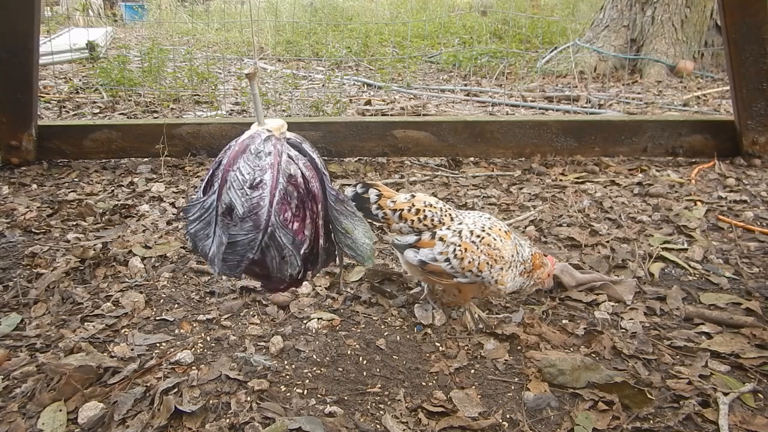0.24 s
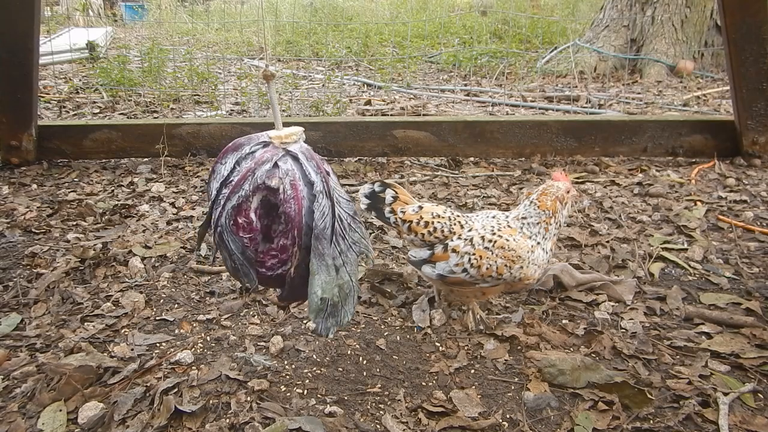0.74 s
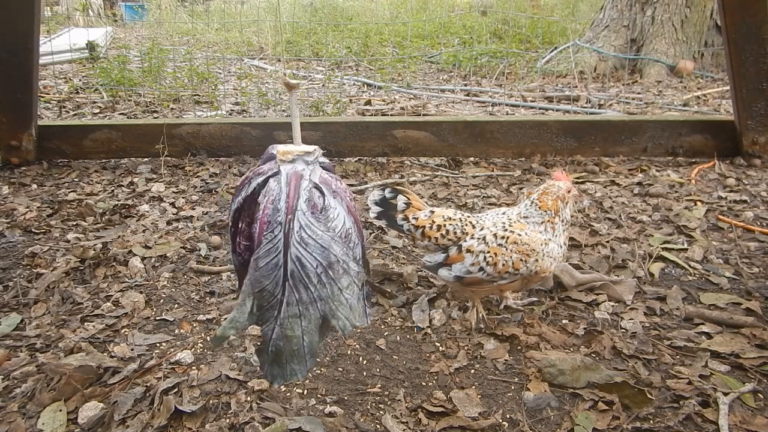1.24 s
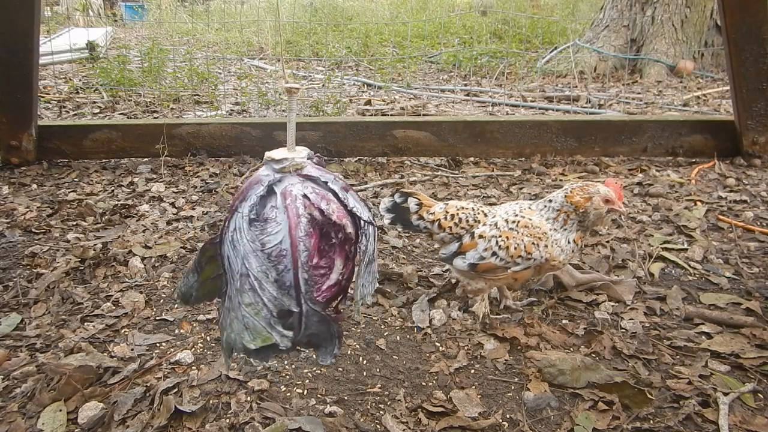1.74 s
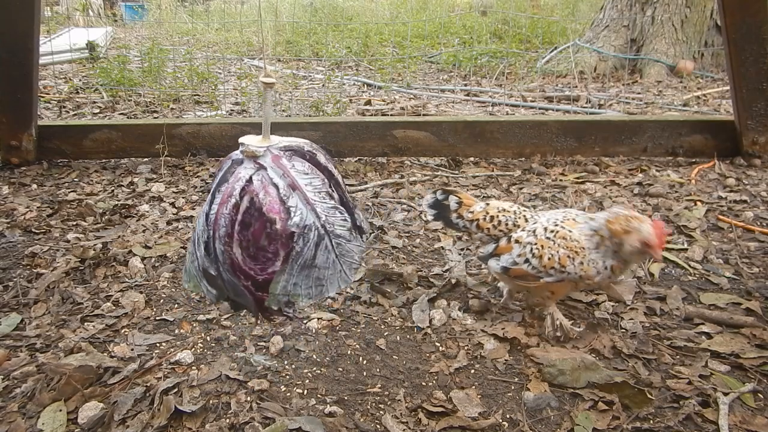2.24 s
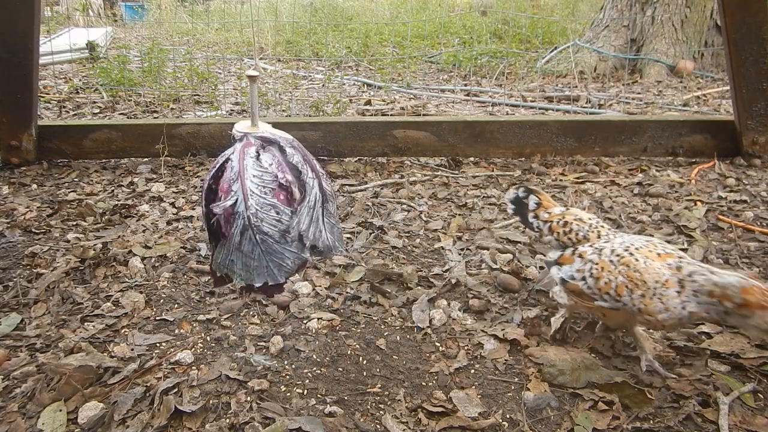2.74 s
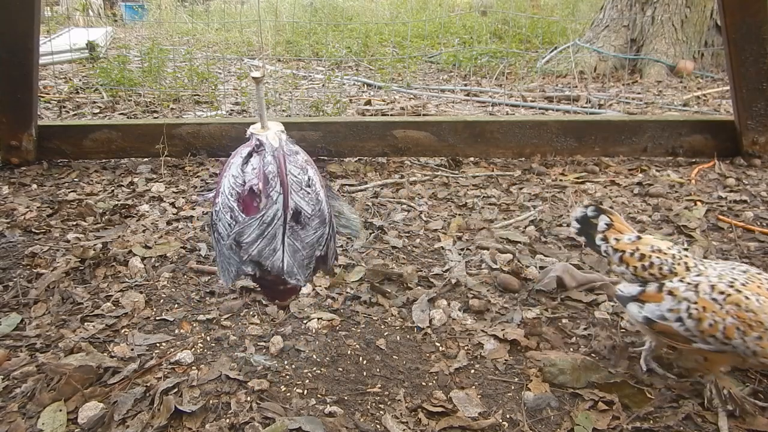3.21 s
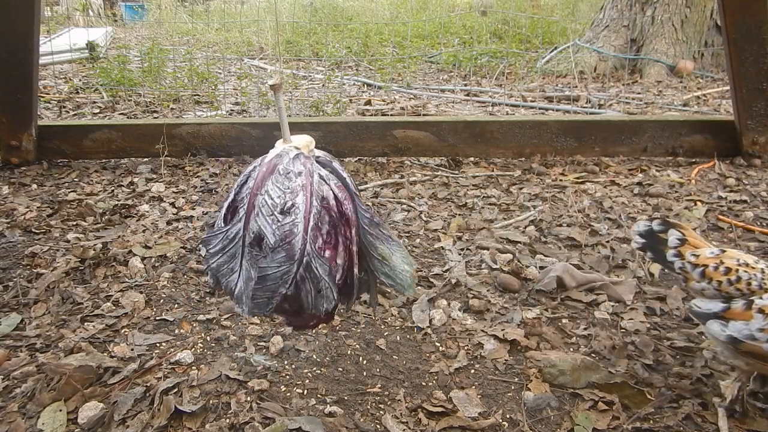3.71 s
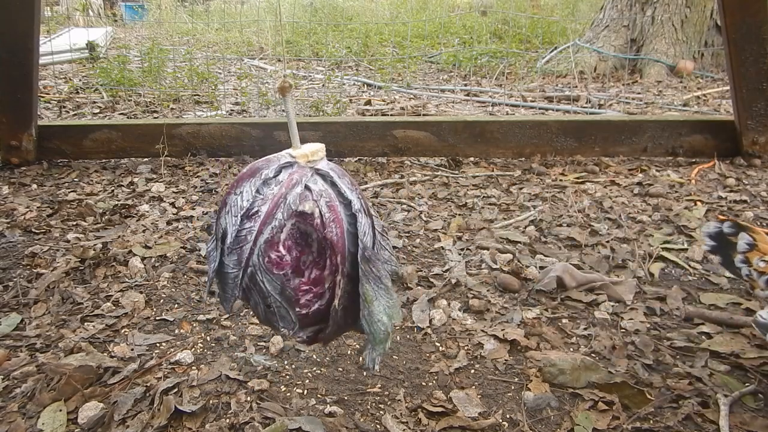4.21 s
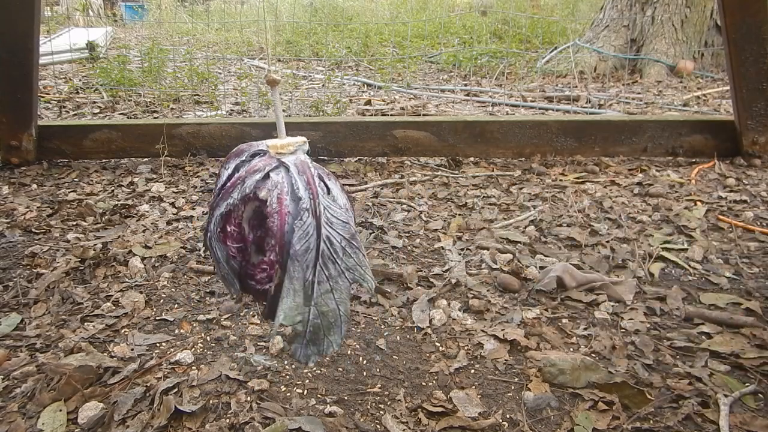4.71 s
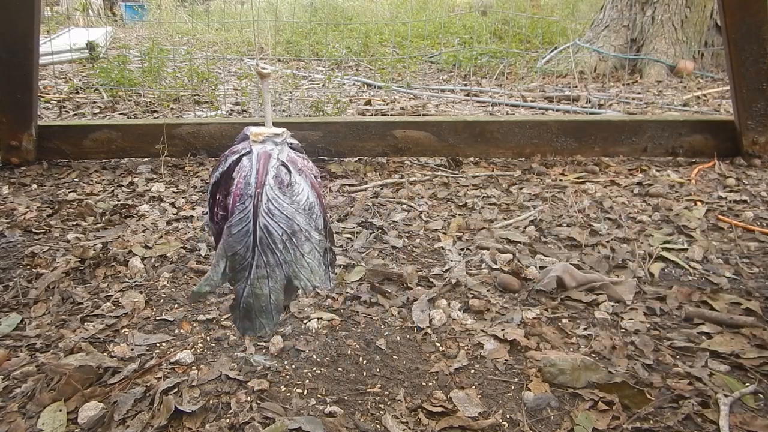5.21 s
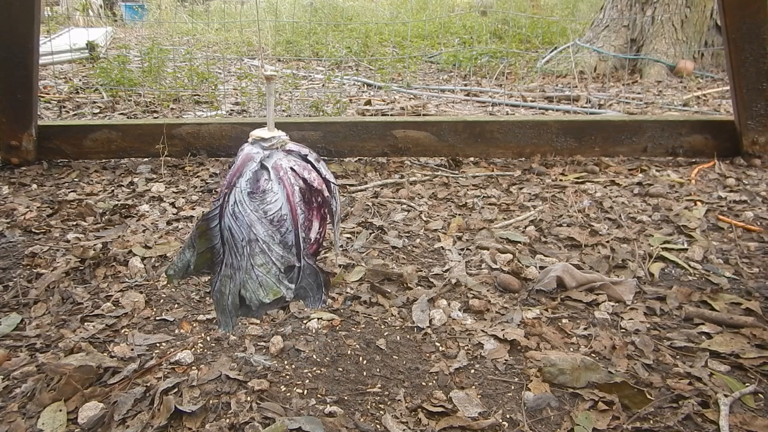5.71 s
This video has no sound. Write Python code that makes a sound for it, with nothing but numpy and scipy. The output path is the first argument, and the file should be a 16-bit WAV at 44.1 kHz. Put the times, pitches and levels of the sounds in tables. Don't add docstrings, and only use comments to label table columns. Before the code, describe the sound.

Outdoors, quiet leaf litter crackles above a steady distant drone; one sharp snap at left, then vigorous crunchy leaf raking nearby.

```python
import sys
import numpy as np
from scipy import signal
from scipy.io import wavfile
from scipy.ndimage import uniform_filter1d

SR = 44100
rng = np.random.default_rng(int(sys.argv[2]) if len(sys.argv) > 2 else 0)


def attenuation_scalar(level_db):
    decades = np.asarray(level_db, float) / 20
    return 10 ** decades


def inscribe(sig):
    pcm = np.round(np.clip(np.atleast_2d(sig).T, -1, 1) * 32767)
    wavfile.write(sys.argv[1], SR, pcm.astype(np.int16))


N = 262395

# f/Hz, level/dB
LEAF = [(300, -5.5), (700, -9.5), (1500, -3.5), (3000, -0.5), (5000, 9.5), (8000, 2.5), (11000, -12.5),
        (15000, -28)]
# f/Hz, width/Hz, level/dB
LEFT_PORT = [(7300, 210, 3), (9360, 660, 1.5), (11200, 400, -5), (12300, 1100, 1), (13900, 500, -2)]
RIGHT_PORT = [(6400, 450, 4), (8840, 810, 2.5), (10900, 470, -15), (11900, 500, -2), (12800, 400, -8)]


def evened(x):
    return x / np.sqrt(np.mean(x ** 2) + 1e-20)


def read(points, hz):
    f, value = np.transpose(points)
    return np.interp(np.log(hz + 1), np.log(f + 1), value)


def add(mix, s, sound):
    part = mix[:, round(s * SR):][:, :sound.shape[-1]]
    part += sound[..., :part.shape[1]]


def slow(rate, count):
    t, phase = np.arange(0, N, 256) / SR, rng.random((count, 20, 1))
    f = np.geomspace(.15, rate, 20)[:, None]
    drift = (np.sin(2 * np.pi * (f * t + phase)) / np.sqrt(f)).sum(axis=1)
    return np.array([np.interp(np.arange(N) / SR, t, evened(d)) for d in drift])


def sides(lean_db):
    return attenuation_scalar(np.array([lean_db / 2, -lean_db / 2]))


def bandpassed(x, order, edges_hz):
    return signal.sosfilt(signal.butter(order, edges_hz, "bandpass", fs=SR, output="sos"), x)


def housed(x, colour, ports=([], [])):
    # f/Hz, width/Hz, level/dB
    housing = [(2505, 178, -18.5), (5005, 81, -17), (6175, 1630, 8.5), (7326, 960, -10), (8180, 800, 3.5),
               (10270, 1260, -5.5), (12000, 590, 4)]
    hz = abs(np.fft.fftfreq(8192, 1 / SR))
    db = []
    for port in ports:
        bumps = sum(peak_db * np.exp(-(2 * (hz - f) / w) ** 2) for f, w, peak_db in housing + port)
        db.append(read(colour, hz) + bumps)
    log_gain = np.log(attenuation_scalar(np.array(db)))
    phase = -signal.hilbert(log_gain).imag
    taps = np.fft.ifft(np.exp(log_gain + 1j * phase)).real[:, :2048]
    return signal.oaconvolve(x, taps, axes=1)[:, :x.shape[1]]


def split(x, edges_hz=(300, 2450, 7300, 10700, 16000)):
    return [evened(bandpassed(x, 4, edge)) for edge in zip(edges_hz, edges_hz[1:])]


def two_ports(direct, scattered, share):
    share = np.clip(share, 0, 1)
    return np.sqrt(1 - share) * np.array([direct, np.roll(direct, 1)]) + np.sqrt(share) * scattered


def pushes(rows, entry_db, fall_db_per_s):
    s, push, peak_db = np.transpose(rows)[:3, :, None]
    since = np.arange(0, N / SR + .002, .001) - s
    swell_db = entry_db * np.clip(1 - since / push, 0, 1)
    db = peak_db + swell_db - fall_db_per_s * np.maximum(since - push, 0)
    return attenuation_scalar(db) ** 2 * np.clip(since / .002 + 1, 0, 1)


def per_sample(curve):
    return np.interp(np.arange(N) / SR, np.arange(len(curve)) / 1000, curve)


def wash():
    # f/Hz, level/dB per Hz
    spectrum = [(30, 5), (60, 18), (85, 22), (115, 18), (190, 12), (300, 5.5), (600, -0.5), (1200, 2.5),
                (2000, -6.5), (4000, -7), (6300, -11), (8100, -0.5), (9500, -22.5), (14000, -21)]
    # f/Hz, likeness
    likeness = [(60, 1), (130, 1), (290, 0.37), (640, 0.39), (1410, 0.34), (3100, 0.083), (6820, 0.11),
                (15000, 0.064)]
    # f/Hz, level/dB
    balance = [(60, 2), (180, -3), (550, -3), (1650, -3.5), (4970, 2.5), (15000, -2.5)]
    frames, hz = N // 256 + 5, np.fft.rfftfreq(1024, 1 / SR)
    a, b, c, d, patches = rng.standard_normal((frames, 513, 5)).T
    patches = evened(uniform_filter1d(uniform_filter1d(patches, size=12, axis=0), size=10, axis=1))
    same = np.clip(read(likeness, hz), -1, 1)[:, None]
    right = a + 1j * b
    lead = np.exp(1j * hz / 6000)[:, None]
    left = same * right * lead + np.sqrt(1 - same ** 2) * (c + 1j * d)
    z = np.array([left, right]) * sides(read(balance, hz))[:, :, None] * attenuation_scalar(1.4 * patches)
    air = housed(signal.istft(z, nperseg=1024, noverlap=768)[1][:, :N], spectrum)
    highpass = signal.butter(4, 300, "highpass", fs=SR, output="sos")
    upper = signal.sosfilt(highpass, air.mean(axis=0))
    return attenuation_scalar(-55.5 - 0.84) * air / upper.std()


def engine():
    orders = [6, 12, 14, 15, 16, 17, 18, 21, 24, 26, 27, 30]
    order_db = [-63, -54, -53.5, -53, -66, -64.5, -48, -62.5, -65.5, -70, -67.5, -63.5]
    # t/s, level/dB
    load = [(0, -5), (.46, 3), (.66, 0), (1.06, -9), (1.49, 4.5), (1.8, -3), (2.7, 2.5), (3.55, 3),
            (3.69, -2.5), (3.88, 3), (4.72, 7), (5.25, 0.5), (5.63, -1), (5.95, 5.5)]
    load_share = [0.72, 1.18]
    cycle_hz = 6.25
    order = np.array(orders)[:, None]
    db = np.array(order_db)[:, None] + 1.5 * slow(3.5, count=len(order_db))
    db[1:3] += np.outer(load_share, np.interp(np.arange(N) / SR, *np.transpose(load)))
    turns = np.cumsum(cycle_hz * (1 + 0.00068 * slow(2.75, count=1)[0])) / SR
    lines = np.sin(2 * np.pi * (order * turns + rng.random(order.shape)))
    return (np.sqrt(2) * attenuation_scalar(db) * lines).sum(axis=0) * sides(-4.0)[:, None]


def chirp(length, first_hz, last_hz, overtone_db, rough):
    n = round(length * SR)
    shake, wobble = evened(uniform_filter1d(rng.standard_normal((2, 8000)), size=60))[:, :n]
    glide = first_hz + (last_hz - first_hz) * np.linspace(0, 1, n) ** 1.346
    turn = 2 * np.pi * np.cumsum(glide + 130 * rough * wobble) / SR
    overtones = np.sin(2 * turn) + .3 * np.sin(3 * turn) + .25 * np.sin(4 * turn)
    tone = np.sin(turn) + attenuation_scalar(overtone_db) * overtones
    return np.sqrt(2) * tone * (1 + rough * shake) * signal.windows.tukey(n, .45)


def twitter():
    # t/s, swell/s, level/dB
    bouts = [
        (1.65, 0.094, -48.5),
        (1.83, 0.16, -51),
        (2.07, 0.077, -51.5),
        (2.23, 0.13, -46.5),
        (2.42, 0.135, -47.5),
        (2.63, 0.089, -47),
    ]
    swarm = np.zeros((2, N))
    start_s, end_s = 1.6, 2.85
    for when, pitch, glide, size, side in rng.random((260, 5)):
        hz = 5750 + 1050 * pitch
        note = chirp(0.011 + 0.03 * size, hz, hz + 300 * (glide - .5), -43, 0.21)
        add(swarm, start_s + when * (end_s - start_s), note * sides(9 * side - 6.5)[:, None])
    power = pushes(bouts, entry_db=-1, fall_db_per_s=250).sum(axis=0)
    return swarm * attenuation_scalar(-9.5) * per_sample(np.sqrt(power))


def birds():
    # t/s, length/s, first f/Hz, last f/Hz, overtones level/dB, hoarseness 0-1
    peeps = [
        (.602, .024, 1530, 1330, -9, .2),
        (.828, .028, 1580, 1330, -9, .3),
        (1.378, .042, 1600, 1230, -3, .25),
        (1.655, .04, 1600, 1380, -5, .5),
        (3.853, .028, 690, 720, -14, .15),
        (3.879, .02, 900, 1000, -30, .15),
    ]
    peep_db = [-55, -56.5, -53, -56.5, -56, -49.5]
    # t/s, length/s, first f/Hz, last f/Hz, hoarseness 0-1
    whistles = [(.11, .13, 3110, 3140, .5), (1.42, .105, 1950, 2150, .75), (1.41, .15, 2750, 3000, .8),
                (1.52, .05, 5350, 5380, .3), (1.45, .13, 6100, 6250, .3), (1.815, .07, 2080, 2350, .7),
                (1.945, .06, 2740, 2750, .2), (2.12, .045, 2600, 2780, .6), (2.29, .07, 2740, 2710, .25),
                (2.495, .095, 2740, 2730, .12), (2.655, .1, 2650, 2780, .4), (.605, .045, 4200, 3900, .5),
                (3.879, .027, 1790, 2420, .07), (1.66, .07, 3050, 3250, 1.0), (1.65, .06, 2200, 2100, .9),
                (4.845, .006, 9700, 9300, .5), (5.794, .026, 2300, 2450, .5), (5.8, .026, 1600, 1800, .45),
                (5.795, .03, 830, 850, .3), (5.825, .025, 2250, 2350, .7), (5.64, .06, 1450, 2150, .9),
                (1.06, .02, 4400, 4300, .6), (2.455, .035, 2740, 2730, .2), (.612, .045, 2720, 2720, .35),
                (.838, .045, 2720, 2650, .35), (.825, .06, 4200, 4350, .7), (1.66, .045, 4220, 4180, .4),
                (1.6, .06, 4720, 4700, .4), (1.77, .04, 2620, 2640, .3), (1.84, .045, 3850, 3850, .4),
                (.78, .02, 6300, 5600, .3), (1.385, .06, 2300, 2250, .9), (4.77, .025, 1700, 1500, .9),
                (5.69, .03, 1900, 1650, .9)]
    whistle_db = [-66.5, -63, -63.5, -62, -63, -62, -60.5, -62, -59, -59, -61, -57.5, -46.5, -61.5, -66,
                  -45, -46, -44.5, -61, -49, -48, -58, -64, -59, -62, -63, -64, -66, -62, -66, -58, -62,
                  -50, -48]
    out = np.zeros((2, N))
    for (s, *voice), db in zip(peeps, peep_db):
        add(out, s, attenuation_scalar(db) * chirp(*voice) * sides(-3.0)[:, None])
    for (s, length, first_hz, last_hz, rough), db in zip(whistles, whistle_db):
        add(out, s, attenuation_scalar(db) * chirp(length, first_hz, last_hz, -40, rough) * sides(-3.0)[:, None])
    return out + twitter()


def yard(x):
    t60_s, tail_db, gap_s = 0.14, -7, .006
    t = np.arange(9000) / SR
    tail = rng.standard_normal((2, len(t))) * attenuation_scalar(-60 * t / t60_s) * (t > gap_s)
    return x + attenuation_scalar(tail_db) * signal.fftconvolve(x, tail / np.linalg.norm(tail[0]), axes=1)[:, :N]


def snaps():
    # t/s, level/dB, low part level/dB, left-right level/dB
    wandering = [(0.2725, -35.5, -19, -1.0), (0.6474, -33.5, -17, 11), (0.7337, -22.5, -7, 6),
                 (0.785, -31, -15, -5), (0.8342, -32, -16, -0.5), (1.061, -33.5, -19, -8),
                 (1.1653, -35, -19, -3.0), (2.0297, -34, -18, -2), (2.0586, -29, -10, -0.5),
                 (2.2303, -39, -14, 0.5), (2.2666, -38, -15, -3.5), (2.319, -27, -24, -3.0),
                 (2.5443, -31.5, -16, 1), (2.5888, -37, -14, 2.5), (2.648, -26.5, -19, -2.0),
                 (2.8548, -29.5, -26, -2), (3.0455, -29, -21, -0.5), (3.1472, -29, -20, -4),
                 (3.1812, -27, -23, -3), (3.2445, -30, -25, -4), (3.3453, -29.5, -13, 8),
                 (3.493, -34, -21, -3), (3.5259, -34, -14, 6), (3.8153, -38, -22, 3),
                 (3.8526, -42, -14, 1.5), (3.932, -32.5, -21, -2), (4.0372, -30.5, -23, -4),
                 (4.2628, -31.5, -19, -5.5), (4.3206, -35.5, -26, -3.5)]
    near = [(4.68, -26, -18, -7.5), (4.6992, -29, -25, -8.5), (4.7487, -27, -28, -8.5),
            (4.7624, -19, -23, -12), (4.788, -17, -22, -9.5), (4.8174, -33, -22, -3),
            (4.8394, -33, -26, -4), (4.8573, -23.5, -23, -5), (4.8994, -26, -13, -8.5),
            (4.9105, -25, -20, -9.0), (4.9317, -25, -25, -9.5), (5.0522, -24, -27, -10.5),
            (5.0661, -28, -24, -11), (5.1382, -39, -19, -5.5), (5.196, -20, -33, -11),
            (5.247, -25, -29, -7), (5.383, -21, -28, -10), (5.445, -24, -17, -4.0), (5.4617, -30, -22, -4),
            (5.5575, -25.5, -22, -6.0), (5.5644, -36, -22, -3.0), (5.5973, -22, -15, -10),
            (5.6281, -24, -14, -5), (5.6824, -19, -24, -9.5), (5.6894, -17, -21, -6),
            (5.7094, -15, -24, -8.0), (5.7762, -25, -10, -4.5), (5.8591, -25, -9, -8.0),
            (5.89, -14, -11, -11), (5.9178, -14.5, -18, -7.0)]
    # t/s, level/dB, left-right level/dB
    tick_rows = [(4.6495, -35, -9), (4.691, -29, -8), (4.7557, -22, -8), (4.7719, -21, -11),
                 (4.7778, -23, -9), (4.8006, -27, -9), (4.8475, -32, -5), (4.8669, -35, -7),
                 (4.878, -34, -9), (4.9213, -31, -8), (4.9457, -27, -9), (4.9588, -32, -10),
                 (5.0012, -34, -6), (5.0208, -31, -13), (5.0254, -29, -8), (5.0745, -31, -7),
                 (5.082, -34, -7), (5.1459, -36, -6), (5.1559, -37, -9), (5.1699, -37, -5),
                 (5.1872, -36, -3), (5.2378, -34, -7), (5.2662, -28, -8), (5.2846, -29, -8),
                 (5.2949, -30, -8), (5.3151, -33, -9), (5.3225, -34, -7), (5.3307, -33, -7),
                 (5.3359, -31, -3), (5.3651, -28, -9), (5.3895, -27, -9), (5.4023, -25, -10),
                 (5.4079, -32, -9), (5.4193, -32, -9), (5.4689, -24, -12), (5.4828, -26, -6),
                 (5.4914, -26, -8), (5.5068, -25, -6), (5.5203, -22, -9), (5.5314, -28, -6),
                 (5.545, -32, -5), (5.6028, -32, -8), (5.6133, -34, -4), (5.6533, -21, -9),
                 (5.6634, -19, -11), (5.6723, -17, -9), (5.6958, -16, -8), (5.7041, -16, -11),
                 (5.7184, -18, -6), (5.7352, -23, -7), (5.7469, -25, -5), (5.7611, -30, 1),
                 (5.8069, -30, -3), (5.8536, -32, -6), (5.8759, -22, -12), (5.9031, -20, -8),
                 (5.9144, -18, -9), (5.9258, -18, -8), (5.9391, -22, -8), (5.946, -21, -9)]
    # t/s, level/dB, low part level/dB, left-right level/dB, air level/dB
    more_breaks = [(3.2018, -34, -24, 1, -5), (3.318, -43, -24, 2, 3), (3.3905, -27, -24, 4, -18),
                   (3.3943, -12, -15, 7, -15), (3.3975, -22, -6, 4, -11), (3.442, -38, -2, 0, -25),
                   (.687, -37, -12, 0, -22), (.853, -35, -24, 0, -22), (2.07, -31, -10, -1, -22),
                   (2.6334, -37, -22, -2, -22), (3.1063, -38, -22, -1, -22), (.0473, -40, -20, 2, -22),
                   (3.7988, -40, -22, -1, -22), (3.057, -34, -20, -1, -22), (3.295, -39, -18, 1, -22)]
    tick_db, tick_low_db, leaf_air_db = -3, -15, -22
    ticks = [(s, db + tick_db, tick_low_db, lean_db) for s, db, lean_db in tick_rows]
    breaks = [(*row, leaf_air_db) for row in wandering + near + ticks] + more_breaks
    out, t = np.zeros((2, N)), np.arange(900) / SR
    noise = rng.standard_normal((len(breaks), 3, len(t)))
    noise[:, :, 0] = 2.0
    noise *= np.exp(-t / .0008) + .25 * np.exp(-t / .004)
    raw = []
    for direct, *scattered in noise:
        raw.append(housed(two_ports(direct, np.array(scattered), 0.082), LEAF, (LEFT_PORT, RIGHT_PORT)))
    bands = split(np.array(raw))
    for (s, peak_db, low_db, lean_db, air_db), low, mid, top, air in zip(breaks, *bands):
        lean = sides(lean_db)[:, None]
        bright = (mid + 0.4 * top) * lean
        crack = bright + attenuation_scalar(low_db - 1.0) * low * lean + attenuation_scalar(air_db) * air
        add(out, s, attenuation_scalar(peak_db - 3.0) * crack / abs(bright.mean(axis=0)).max())
    return out


def cracks():
    leaf_sizes_hz = [500, 900, 1500, 2200, 3200, 4400, 6000, 8000, 11000]
    cracks_per_s, spread_db, hiss_share = 850, 3.0, .3
    clumps = attenuation_scalar(1.3 * evened(uniform_filter1d(rng.standard_normal(N), size=250)))
    out = np.zeros((3, N))
    for hz in leaf_sizes_hz:
        when = rng.random(N) < cracks_per_s / SR
        size = attenuation_scalar(spread_db * np.minimum(rng.exponential(1, N), 2.2)) * when
        decay = np.exp(-hz / SR / 1.6)
        burst = signal.lfilter([1], [1, -decay], size ** 2) ** .5
        grains = (evened(burst) + hiss_share) * rng.standard_normal((3, N))
        out += bandpassed(grains, 1, [hz / 1.3, hz * 1.3])
    return clumps * out


def claws():
    # t/s, level/dB, left-right level/dB
    shuffle = [(0, -63, 2), (.55, -58.5, 2), (.65, -56.5, 1), (.98, -54.5, -1), (1.2, -63.5, 7),
               (1.6, -61.5, 6), (1.7, -56.5, -3), (2.0, -56, 0), (2.35, -51, -3), (2.94, -55.5, -1),
               (3.3, -51.5, 0), (3.47, -51, 1), (3.61, -58, 4), (3.86, -53.5, 1), (4.21, -58.5, 2),
               (4.62, -58.5, -7), (4.85, -51, -9), (5.95, -45, 6)]
    # t/s, push/s, level/dB, low scuff level/dB, left-right level/dB
    scuffs = [(.04, 0.047, -49.5, -18, 3), (.6, 0.026, -63, -8, 4), (1.04, 0.025, -54, -27, -15),
              (1.145, 0.017, -53.5, -15, -7), (1.33, 0.092, -54, -9, -1), (1.4, .1, -57, 0, -3),
              (.83, 0.047, -56.5, 0, -2), (1.645, 0.075, -56, 0, -4), (2.045, 0.017, -44.5, -6, -2),
              (2.54, .05, -53.5, -9, 8), (3.0, 0.037, -50, -12, 1), (3.17, 0.053, -55, -35, 1),
              (3.5, 0.038, -48.5, -16, 1), (3.73, 0.025, -66, -13, 2), (3.81, .015, -54, -25, 1),
              (3.85, 0.021, -50.5, -16, 0), (4.26, 0.061, -52.5, -14, -7)]
    # t/s, push/s, level/dB, low scuff level/dB
    rakes = [(4.635, .01, -48, -14), (4.68, 0.022, -36, -11), (4.745, 0.028, -32, -12),
             (4.898, 0.039, -40.5, -9.5), (5.018, 0.022, -40, -13), (5.15, 0.066, -53, -16),
             (5.25, 0.033, -41, -11), (5.32, 0.07, -40.5, -11), (5.445, 0.038, -34.5, -11),
             (5.52, 0.028, -45.5, -10), (5.627, 0.024, -35, -13), (5.652, 0.038, -26, -14.5),
             (5.695, 0.022, -30.5, -11.5), (5.79, 0.04, -42, -5.5), (5.865, 0.017, -34, -14.5),
             (5.884, 0.017, -28, -6.5), (5.9, 0.056, -30, -9)]
    # t/s, push/s, level/dB, low scuff level/dB, left-right level/dB
    flicks = [
        (2.022, 0.0064, -44.5, -10, 0),
        (3.395, 0.0067, -36.5, -9.5, 9),
        (1.3, 0.0042, -52, -13, 1),
        (5.244, 0.0035, -36, -17, -13),
        (7.5, .004, -33, -22, -18),
    ]
    rake_lean_db, shuffle_low_db, entry_db = -8, -9.5, -4.5
    strokes = scuffs + [(*row, rake_lean_db) for row in rakes]
    power = np.vstack([pushes(strokes, entry_db, fall_db_per_s=272),
                       pushes(flicks, entry_db, fall_db_per_s=798)])
    s, db, lean_db = np.transpose(shuffle)
    t = np.arange(power.shape[1]) / 1000
    bed = attenuation_scalar(np.interp(t, s, db)) ** 2
    total = bed + power.sum(axis=0)
    low_db, side_db = np.transpose(strokes + flicks)[3:] @ power
    low_db = (low_db + bed * shuffle_low_db) / total
    side_db = (side_db + bed * np.interp(t, s, lean_db)) / total
    return per_sample(np.sqrt(total)), per_sample(low_db), per_sample(side_db)


def scratching():
    # t/s, push/s, level/dB
    digs = [
        (4.64, .015, -49),
        (4.675, 0.08, -55),
        (4.95, 0.072, -60),
        (5.3, .1, -61),
        (5.44, 0.072, -53),
        (5.63, 0.13, -53),
        (5.885, 0.047, -36),
    ]
    level, low_db, lean_db = claws()
    top_db = -9 + 0.033 * (low_db + 9)
    grain = cracks()
    leaves = housed(two_ports(grain[0], grain[1:], 0.2), LEAF, (LEFT_PORT, RIGHT_PORT))
    low, mid, top, air = split(leaves)
    body = attenuation_scalar(low_db + 3.0) * low * sides(-1.0 + 0.12 * lean_db)
    crackle = mid * sides(0.93 * lean_db)
    fizz = attenuation_scalar(top_db + 3.5) * (top * sides(0.97 * lean_db) + attenuation_scalar(-16.5) * air * [[1.2], [-.8]])
    dull = evened(bandpassed(low, 2, [300, 1100]))
    digging = per_sample(np.sqrt(pushes(digs, entry_db=-3, fall_db_per_s=198).sum(axis=0)))
    soil = attenuation_scalar(-6.0) * digging * dull * sides(-3.0)[:, None]
    return attenuation_scalar(-1.64) * level * (body + fizz + crackle) + soil


def scene():
    return wash() + engine() + yard(birds()) + snaps() + scratching()


def top_cut(x):
    return signal.sosfilt(signal.butter(12, 15810, fs=SR, output="sos"), x)


def record(dry):
    edge = signal.firwin(255, 15600, window=("kaiser", 9), fs=SR)[None]
    mix = signal.oaconvolve(dry, edge, "same", axes=1)
    return top_cut(mix)


dry = scene()
out = record(dry)
inscribe(out)
```